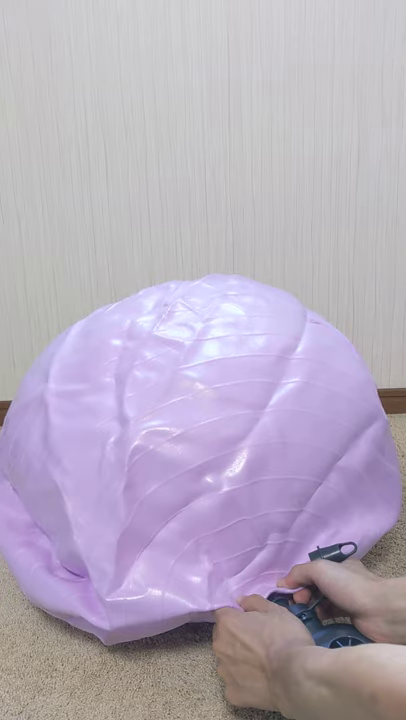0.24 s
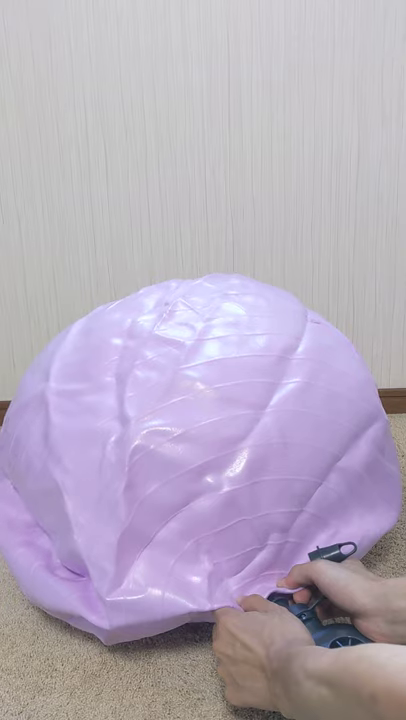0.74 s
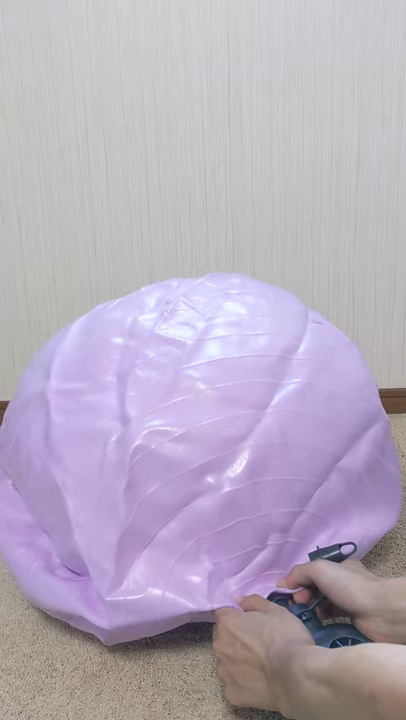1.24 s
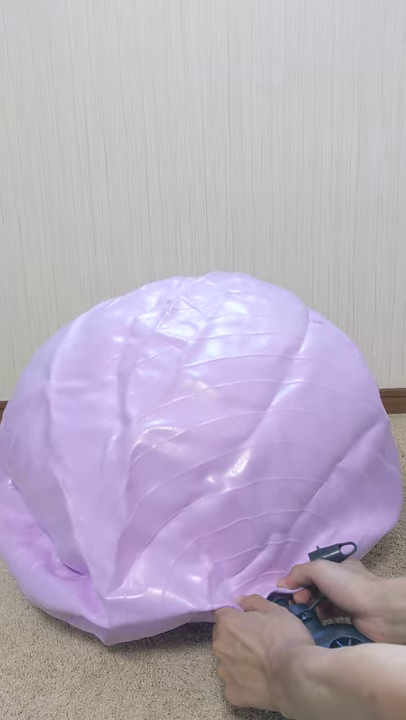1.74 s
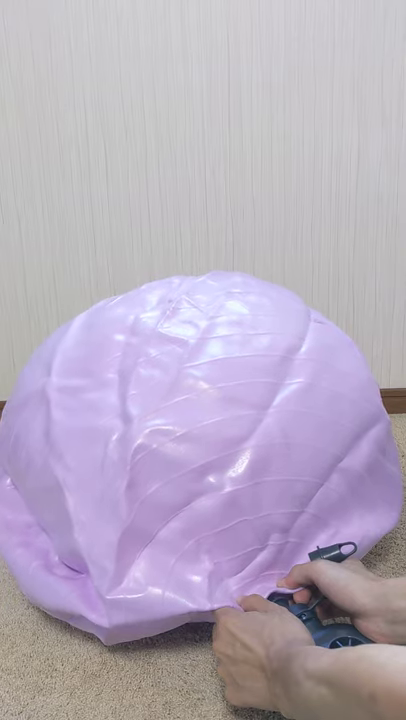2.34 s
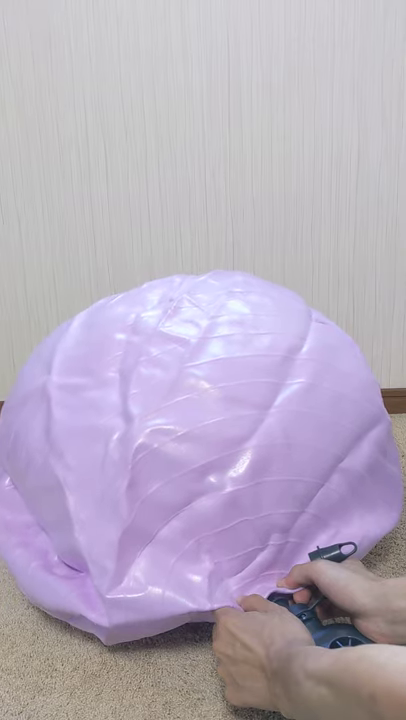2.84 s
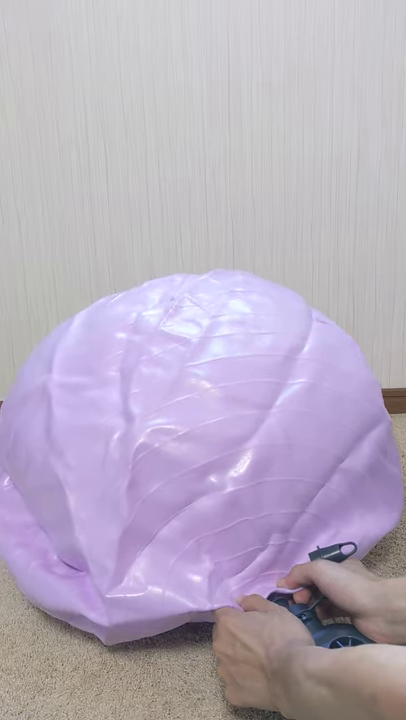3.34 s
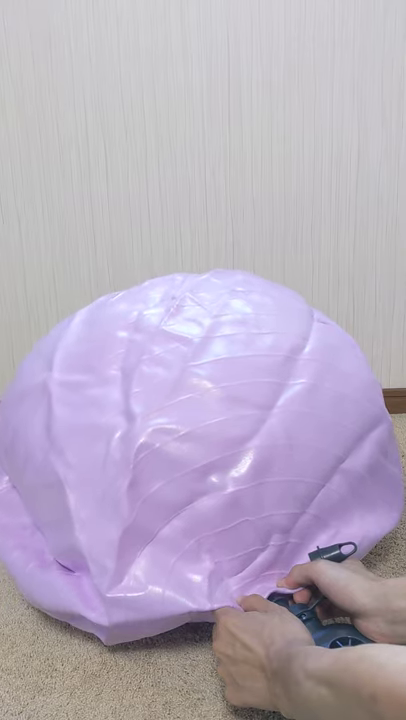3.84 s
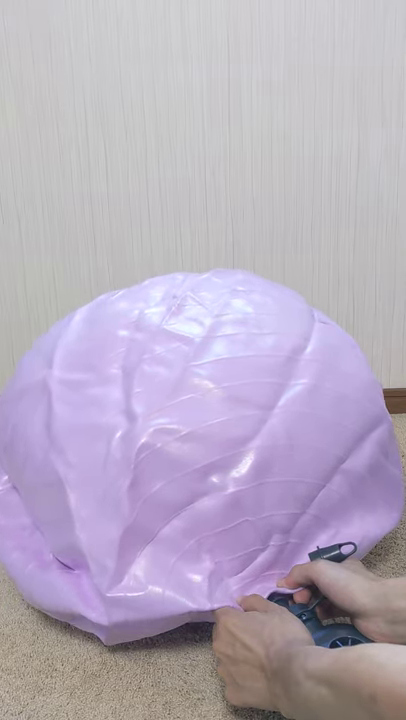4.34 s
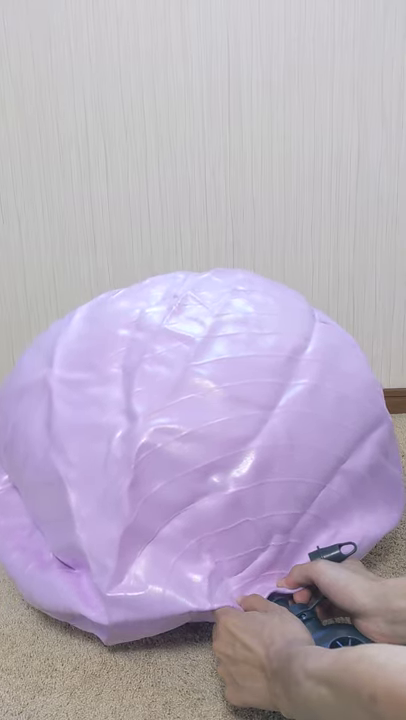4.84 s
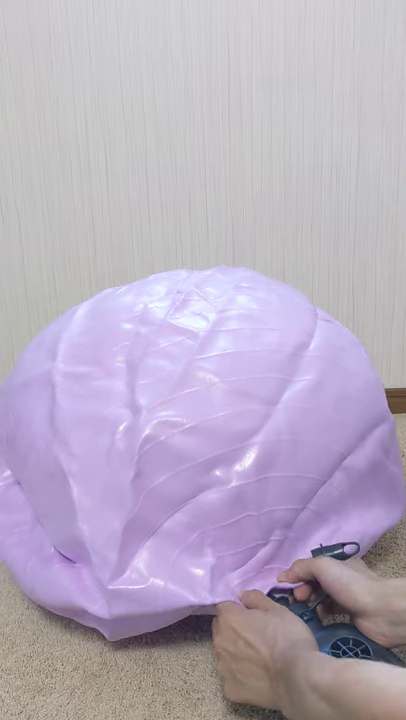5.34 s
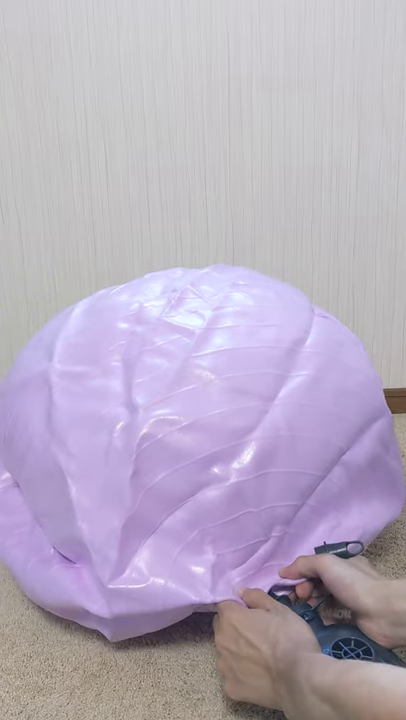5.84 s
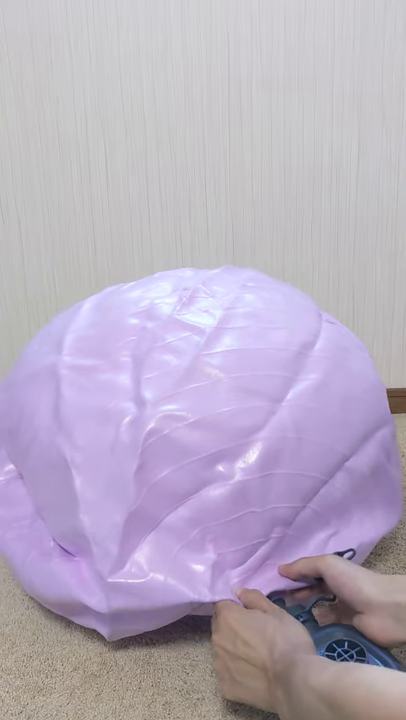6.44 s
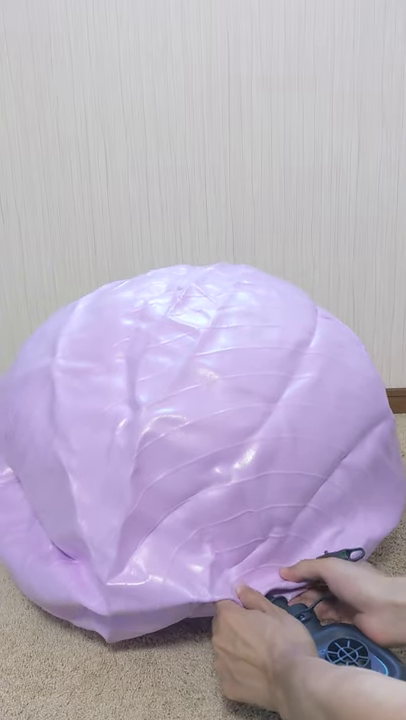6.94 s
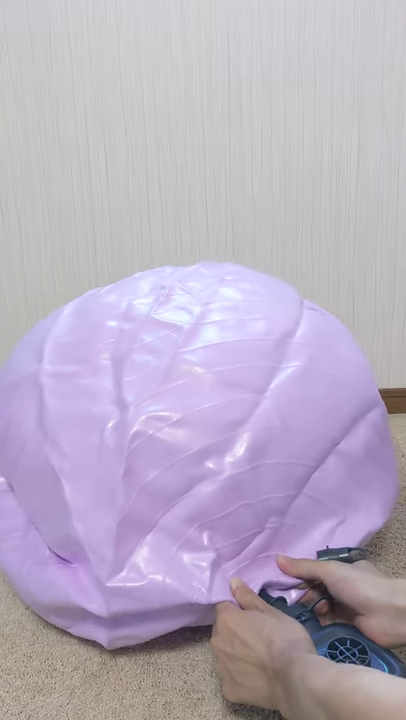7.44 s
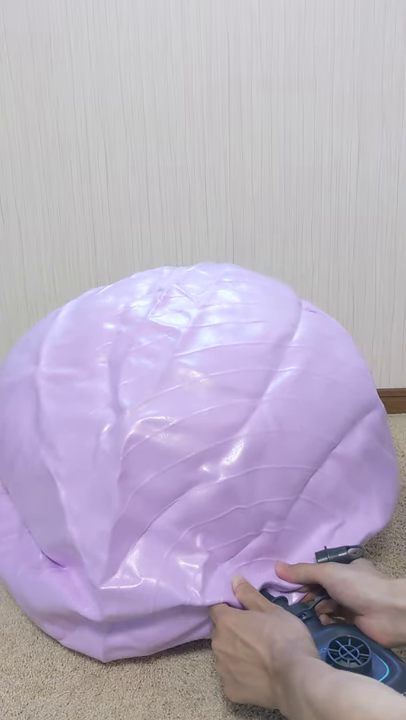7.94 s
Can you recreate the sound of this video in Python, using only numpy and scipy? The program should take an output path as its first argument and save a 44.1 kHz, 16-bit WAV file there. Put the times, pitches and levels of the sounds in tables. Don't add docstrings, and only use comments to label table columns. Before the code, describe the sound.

A small electric air pump, held in the hands, blows steadily into a large soft plastic ball. A clear high whine near 3 kHz with overtones rides on dense rushing air. Halfway through, the pitch sags very slightly and the whine swells and fades differently left and right as the pump is turned. Small carpeted room, close stereo phone microphone, no pauses.

```python
import sys
import numpy as np
from scipy import signal
from scipy.fft import rfft
from scipy.io import wavfile
from scipy.ndimage import uniform_filter1d

SR = 44100
rng = np.random.default_rng(int(sys.argv[2]) if len(sys.argv) > 2 else 0)


def unload_wav(signal):
    wavfile.write(
        sys.argv[1],
        SR,
        np.round(np.clip(np.atleast_2d(signal).T, -1, 1) * 32767).astype(np.int16),
    )


def level_to_linear(level):
    exponent = np.asarray(level, float) / 20
    return 10 ** exponent


N = 362061
TIME = np.arange(N) / SR
BLADES = 10
MAINS_HZ = 120


def evened(x):
    return x / np.sqrt(np.mean(abs(x) ** 2) + 1e-20)


def columns(rows, at):
    first, *rest = np.transpose(rows)
    return np.array([np.interp(at, first, column) for column in rest])


def on_log(rows, hz):
    rows = np.array(rows)
    return columns(np.c_[np.log(rows[:, 0]), rows[:, 1:]], np.log(hz + 1))


def wander(rate_hz, count):
    slow = rng.standard_normal((count, N // 64 + 2))
    lowpass = signal.butter(2, rate_hz, fs=SR / 64, output="sos")
    slow = signal.sosfiltfilt(lowpass, slow)
    return np.clip(evened(np.repeat(slow, 64, axis=1)[:, :N]), -2, 2)


# time_s, shaft_hz
SHAFT_SPEED = [(0.0, 296.76), (0.4, 296.71), (1.5, 296.97), (2.1, 296.63), (2.45, 296.7), (3.25, 297.32),
               (3.6, 296.61), (4.15, 295.1), (4.85, 294.6), (5.2, 294.19), (5.75, 292.24), (6.3, 291.92),
               (6.8, 292.65), (7.15, 292.55), (7.7, 292.32), (8.21, 292.47)]


def shaft_angle():
    shaft_hz = columns(SHAFT_SPEED, TIME)[0] + 0.032 * wander(rate_hz=7.4, count=1)[0]
    return 2 * np.pi * np.cumsum(shaft_hz) / SR


# time_s, turn of the intake toward the phone (0-1), roll, tip, lift (no unit)
HAND_MOTION = [(0.0, 0.03, 0.11, -0.057, -0.0), (1.38, 0.05, 0.16, 0.21, 0.48),
               (2.26, 0.06, 0.23, 0.0052, -0.19), (2.74, 0.05, -0.019, 0.13, 0.1),
               (3.26, 0.07, 0.31, 1.0, 1.0), (3.55, 0.05, 0.11, -0.021, 0.55), (3.9, 0.02, 1.0, -0.6, 0.13),
               (4.28, 0.5, 0.58, -0.25, 0.35), (4.88, 0.51, 0.61, -0.016, 0.46),
               (5.32, 0.57, 0.47, 0.57, -0.63), (5.67, 0.8, 0.12, 0.16, -0.71),
               (6.25, 0.8, 0.19, 0.29, -0.27), (6.72, 0.68, 0.52, 0.012, -1.3),
               (7.0, 0.9, -0.3, -0.0092, 0.55), (7.24, 0.9, -0.037, -0.11, 0.11),
               (7.82, 1, -0.15, -0.15, 0.011), (8.0, 0.95, -0.56, -0.18, 0.63),
               (8.21, 0.93, -0.61, 0.11, -0.15)]


def hand_grip():
    return uniform_filter1d(columns(HAND_MOTION, TIME), SR // 10, axis=1)


def beam(rows, grip):
    rows = np.array(rows)
    return rows[:, :1] + rows[:, 1:] @ grip


# time_s, length_s, harmonic, left_db,
# right_db
HARMONIC_SHADES = [(1.05, 0.75, 3, 1, -3), (2.9, 0.45, 4, -0.2, -6.3), (3.8, 0.17, 2, -8, -4.1),
                   (3.95, 0.52, 4, 3.5, -17), (4.45, 0.69, 3, -0.5, -6), (5.0, 0.55, 4, -1.1, 4.5),
                   (5.246, 0.17, 2, -0.5, -6.5), (5.5, 0.26, 4, -3, -6), (5.55, 0.4, 3, 2.8, 0),
                   (5.8, 0.2, 3, -4, -8.4), (5.85, 0.25, 1, 2.5, -6), (5.85, 0.3, 4, 5, -4.8),
                   (5.95, 0.3, 2, -2.5, -1), (6.4, 0.55, 3, 2, -13), (6.45, 0.46, 4, -5, -12),
                   (6.7, 0.16, 3, -11, -1), (7.15, 0.62, 3, 1.0, 2), (7.3, 1, 5, -4.9, 0.3),
                   (7.497, 0.65, 1, 1.5, -4), (7.6, 0.75, 4, -10, -5.7)]


def shading():
    shade_db = np.zeros((2, 5, N // 64 + 1))
    for centre_s, length_s, harmonic, *port_db in HARMONIC_SHADES:
        bell = np.exp(-(2 * (TIME[::64] - centre_s) / length_s) ** 2)
        shade_db[:, round(harmonic) - 1] += np.outer(port_db, bell)
    return np.repeat(shade_db, 64, axis=2)[:, :, :N]


# first_grip_db, then db per unit of turn, roll, tip, lift
LEFT_BEAM = [(-34, 13, -6, 10.0, 1.2), (-30, 9.5, 5.5, 2.5, 2), (-27, -1.5, -6, -7.5, 0),
             (-20.5, -14.5, 1.5, 5.5, -2.5), (-24, -15, -7.5, -0.6, -5.2)]
# first_grip_db, then db per unit of turn, roll, tip, lift
RIGHT_BEAM = [(-18, -4, -6.2, 1.0, -0.48), (-25.5, -0.6, 5, 4.5, -1.9), (-30, -11, 12.5, 7, -0.27),
              (-35.5, -12, 9, -6, -1.7), (-49.5, -9, -7, 5, -0.8)]
LEFT_LEAD = [(-2.5, 3.5, 3, -1.09, -0.049), (-1.38, -6.5, -2.5, 1.61, 0.38), (-2.5, -11, 0.55, -0.79, 1.2)]


def blade_whine(angle):
    grip = hand_grip()
    tremor_db = 0.9 * grip[0] * np.arange(1, 6)[:, None]
    shake_db = tremor_db * wander(rate_hz=2.5, count=10).reshape(2, 5, N)
    beams_db = np.array([beam(LEFT_BEAM, grip), beam(RIGHT_BEAM, grip)])
    left, right = level_to_linear(beams_db + shake_db + shading())
    leads = [*beam(LEFT_LEAD, grip), 1.7, -.3]
    flutter = level_to_linear(0.29 * wander(rate_hz=31, count=5))
    out = np.zeros((2, N))
    for k in range(5):
        blade = (k + 1) * BLADES * angle
        out += flutter[k] * [left[k] * np.cos(blade + leads[k]), right[k] * np.cos(blade)]
    return out


# order, left_db, right_db, left_lead_rad
SHAFT_ORDERS = [(1, -37.5, -37.5, 0.07), (3, -57, -43.5, -0.5), (6, -50.5, -59.5, -0.7),
                (7, -50.5, -58, -0.5), (8, -47, -70, 0.5), (12, -49.5, -46.5, -0.5), (19, -58, -41, -1.5),
                (29, -59, -56, -3), (39, -56, -63, 7), (41, -49, -66, -3), (49, -50, -75, -4)]


def shaft_tones(angle):
    swells = level_to_linear(1.4 * wander(rate_hz=3.0, count=len(SHAFT_ORDERS)))
    swells[0] = level_to_linear(0.16 * wander(rate_hz=4.1, count=1)[0])
    out = np.zeros((2, N))
    for swell, (order, left_db, right_db, lead) in zip(swells, SHAFT_ORDERS):
        spin = round(order) * angle
        out += swell * [level_to_linear(left_db) * np.cos(spin + lead), level_to_linear(right_db) * np.cos(spin)]
    return out


def mains_tones(angle):
    mains = 2 * np.pi * MAINS_HZ * TIME
    side_tone = level_to_linear([[-46], [-50]]) * np.cos(BLADES * angle + mains)
    return side_tone + level_to_linear(-89) * np.cos(mains)


def motor():
    angle = shaft_angle()
    return np.sqrt(2) * (blade_whine(angle) + shaft_tones(angle) + mains_tones(angle))


def resonance_bells(centre, width, hz):
    return 1 / (1 + (2 * (hz - centre[:, None]) / width[:, None]) ** 2)


# pitch_hz, left_db, right_db
RUSH_COLOUR = [(30, -94, -95), (100, -83, -83), (155, -67.5, -67.5), (215, -61.5, -61.5),
               (500, -58.5, -58.5), (1000, -57.5, -58.5), (1500, -59.5, -60), (3000, -63.5, -62),
               (4700, -70.5, -69), (7000, -67, -66.3), (9000, -64.6, -63.5), (12000, -63.3, -70),
               (14000, -65.5, -77), (15700, -64.5, -100)]
# pitch_hz, width_hz, left_db, right_db,
# left_turned_db, right_turned_db
AIR_RESONANCES = [(699, 160.0, 5, 4.5, 6, 4.5), (1001, 120, 4, 5.6, 2.5, 5.5), (1246, 330.0, 10.5, 11.6, 9, 11),
                  (1787, 240.0, 5.5, 4.5, 4, 2), (2210, 220, 2.5, 6.5, 0.2, 5), (2406, 370, 8, -3.5, 5, -4.2),
                  (3224, 200.0, -0.8, 2.5, -6.5, 2), (4680, 96, 0, 0.5, -2.5, 3), (4250, 240, 2.5, 3, 4, 2.5),
                  (1058, 81, -6, 1.5, -2, 2), (3685, 430.0, 8, 7.5, 7, 7), (5556, 200, 0, 10, 7, 4),
                  (5847, 440, 7.5, 6.5, 9, 4.5), (6075, 840, 5, 7, 3.5, 7.5),
                  (8140, 780, 5, 9, 5.5, 6), (9190, 240, 7.5, 1, 5.5, -0.5),
                 (9920.0, 560, 4.5, -6.5, -0.5, -3.5), (10140, 430, -2, -10.5, -4.2, -4),
                 (10930, 530.0, 5, -2.5, 5.3, -6.5), (11950, 390.0, 6.5, 7, 1, -1),
                 (11880, 270.0, 2, -8, 3.5, -8), (12820, 400.0, 2, 2.4, 7, -4),
                 (13150, 1100, 2.5, -5, 1.5, 6.5), (13760.0, 120, 6, 10, 9.5, -8),
                 (13900, 380.0, 0.5, 4, 2, -3), (14870, 500.0, 3.5, 11, 1.5, 16),
                 (15660.0, 430, -6.5, 6.7, 6, 13.4)]
# pitch_hz, width_hz, level_db
ROOM_WAVES = [(211.6, 15, 7.5), (260, 89, -6.5), (275, 78, 2.5), (370, 21, -12), (408, 87, 4.5),
              (444.5, 27.6, -11.5), (534, 39, 1.5), (572, 38, -6.5), (606, 36, 3.5), (656, 50.0, -8),
              (731.6, 97, 9.0), (733.7, 33, -17.5), (801, 15, -10), (853, 17, -9.5), (930, 12, -9),
              (1078, 40, 3), (1081, 8.8, 7), (1268, 29, -8), (1324, 70.0, 10), (1325, 62, -5),
              (1373, 17, 3.5), (1508, 26, -9), (1553, 7.8, -2.5), (1910, 17, 3.5), (2090, 20, -2.5),
              (2103, 19, 5.5), (2090, 14, -0.5)]


def rush_colour(hz, turn):
    centre, width, *boost_db = np.transpose(np.array(AIR_RESONANCES))
    boost_db = np.array(boost_db) @ resonance_bells(centre, width, hz)
    before_db, after_db = boost_db.reshape(2, 2, -1, 1)
    colour_db = on_log(RUSH_COLOUR, hz)[:, :, None] + before_db + turn * (after_db - before_db)
    centre, width, wave_db = np.transpose(ROOM_WAVES)
    return colour_db + (wave_db @ resonance_bells(centre, width, hz))[:, None]


def rooms(t60, direct, count, size):
    t = np.arange(size // 2) / SR
    echoes = rng.standard_normal((count, size // 2)) * level_to_linear(-60 * t / t60) * (t > .002)
    ripple = direct + rfft(echoes, size) / np.linalg.norm(echoes, axis=1)[:, None]
    return ripple / np.sqrt(uniform_filter1d(abs(ripple) ** 2, 40, axis=1))


def echo_paths(hz, turn, size):
    angle = np.pi / 2 * np.outer(np.clip(hz / 5000, 0, 1), turn)
    paths = rooms(t60=.13, direct=0.59, count=6, size=size)
    dense = np.clip((hz - 700) / 1500, 0, 1)
    dense *= np.clip(1.15 - hz / 24000, 0, 1)
    paths = (abs(paths) ** dense * np.exp(1j * np.angle(paths)))[:, :, None]
    return np.split(paths[:3] * np.cos(angle) + paths[3:] * np.sin(angle), [1])


# pitch_hz, likeness (0-1), right_lead_rad
PORT_LIKENESS = [(30, .6, 0), (150, .985, .03), (500, .993, -.05), (760, .9, -.1), (1050, .7, 3.0),
                 (1400, .85, 3.1), (1550, .75, .6), (2500, .7, .3), (3600, .6, 2.4), (4150, .62, 2.8),
                 (5800, .78, .5), (7500, .62, 2.9), (9300, .35, 1.2), (15000, .2, 1.5)]


def port_likeness(hz):
    pitch_hz, likeness, lead_rad = np.transpose(PORT_LIKENESS)
    x, y = on_log(np.c_[pitch_hz, likeness * np.cos(lead_rad), likeness * np.sin(lead_rad)], hz)
    same = np.clip(np.hypot(x, y), 0, 1)[:, None]
    lead = np.exp(1j * np.outer([0, 1], np.arctan2(y, x)))[:, :, None]
    return same, lead


def rush():
    size = 4096
    hz = np.fft.rfftfreq(size, 1 / SR)
    t = (np.arange(4 * N // size + 6) * size / 4) / SR
    turn = np.clip(columns(HAND_MOTION, t)[0], 0, 1)
    level_db = -1.08 * turn
    shared_path, own_path = echo_paths(hz, turn, size)
    same, lead = port_likeness(hz)
    real, imag = rng.standard_normal((len(t), len(hz), 3, 2)).T
    air = real + 1j * imag
    scattered = .6
    apart = np.sqrt(1 - scattered) * air[:1] + np.sqrt(scattered) * air[1:]
    z = np.sqrt(same) * shared_path * lead * air[:1]
    z += np.sqrt(1 - same) * own_path * apart
    z *= level_to_linear(rush_colour(hz, turn) + level_db - level_db.mean())
    x = evened(signal.istft(z, nperseg=size, noverlap=3 * size // 4)[1][:, :N])
    throb = 1 + .04 * np.cos(2 * np.pi * MAINS_HZ * TIME)
    return level_to_linear(-17.5) * x * throb


def hiss():
    highpass = signal.butter(4, 9500, "high", fs=SR, output="sos")
    return level_to_linear(-38.0) * signal.sosfilt(highpass, rng.standard_normal((2, N)))


def scene():
    return motor() + rush() + hiss()


# pitch_hz, level_db
PHONE_STEP = [(800, -45), (1100, -17), (1700, -14.5), (2400, -18.5), (3100, -15.5), (3800, -12.5),
              (4500, -16), (5200, -15.5), (8600, -15.5), (9400, -19), (15700, -19)]


def squeeze(x):
    hop, start, band, used = 1024, 776, 16, 736
    n, k = np.arange(2 * hop) + .5, np.arange(used) + .5
    hz = k * SR / 2 / hop
    window = np.sin(np.pi * n / (2 * hop))[:, None]
    basis = np.sqrt(2 / hop) * window * np.cos(np.pi / hop * np.outer(n + hop / 2, k))
    padded = np.pad(x, ((0, 0), (2 * hop - start, 3 * hop)))
    blocks = padded[:, :padded.shape[1] // hop * hop].reshape(2, -1, hop)
    lines = np.concatenate([blocks[:, :-1], blocks[:, 1:]], axis=2) @ basis
    count = lines.shape[1]
    jitter_db = np.repeat(rng.standard_normal((count, used // band)), band, axis=1)
    relief_db = 3.3 * np.outer(np.arange(count) * hop / SR > 5.2, hz > 9300)
    step = level_to_linear(on_log(PHONE_STEP, hz)[0] + 1.8 * jitter_db - relief_db)
    swap = np.array([[1, 1], [1, -1]]) / np.sqrt(2)
    paired = np.einsum("ab,bfk->afk", swap, lines)

    def band_power(v):
        return (v ** 2).reshape(2, -1, used // band, band).sum(3).prod(0)

    alike = band_power(paired) < 3.0 * band_power(lines)
    joint = np.repeat(alike, band, axis=1) & (hz < 9300)
    lines = np.where(joint, paired, lines)
    level = np.floor((abs(lines) / step) ** (3 / 4) + .4054)
    kept = np.sign(lines) * level ** (4 / 3) * step
    frames = np.where(joint, np.einsum("ab,bfk->afk", swap, kept), kept) @ basis.T
    joined = frames[:, 1:, :hop] + frames[:, :-1, hop:]
    return joined.reshape(2, -1)[:, hop - start:][:, :N]


def roll_off(x):
    return signal.sosfilt(signal.butter(12, 15750, fs=SR, output="sos"), x)


def record(dry):
    mix = squeeze(dry)
    return roll_off(mix)


dry = scene()
out = record(dry)
unload_wav(out)
```